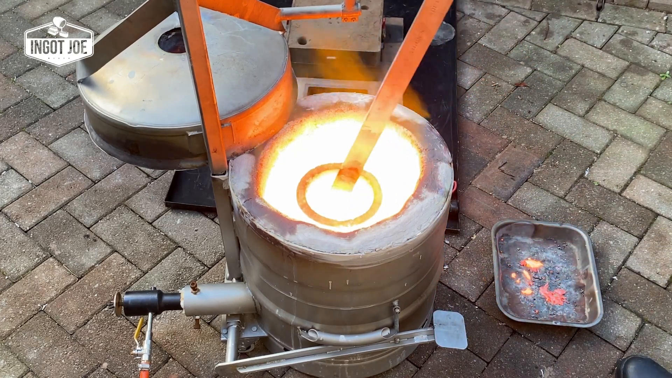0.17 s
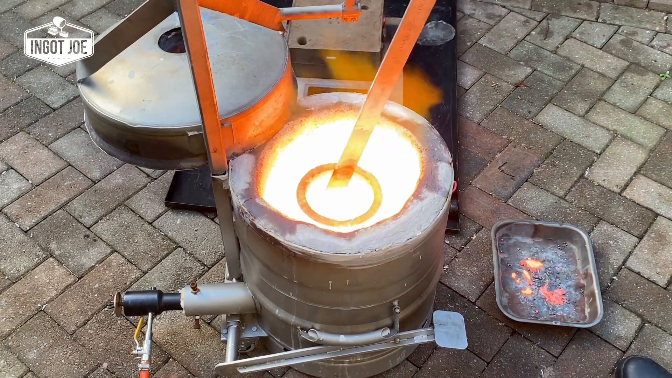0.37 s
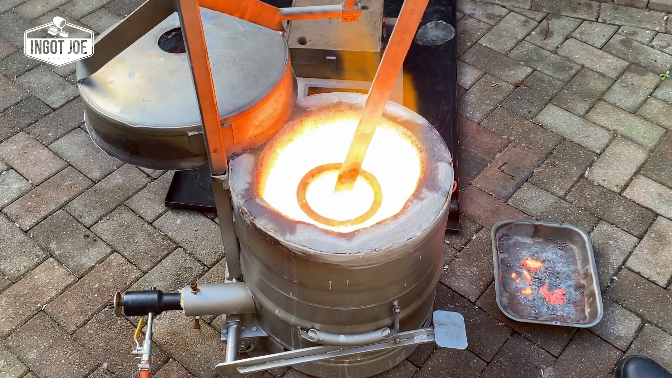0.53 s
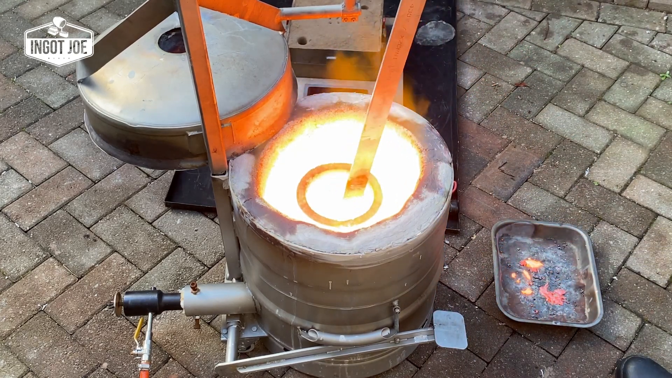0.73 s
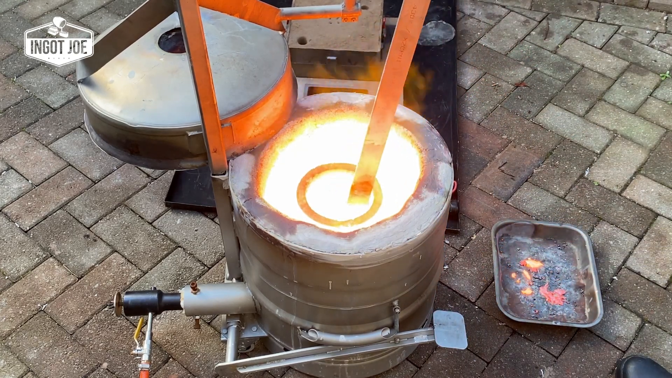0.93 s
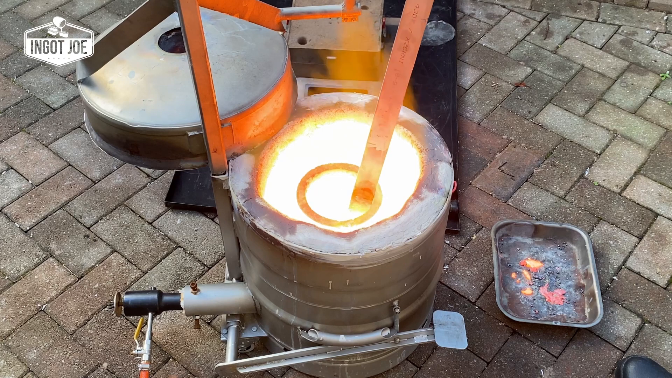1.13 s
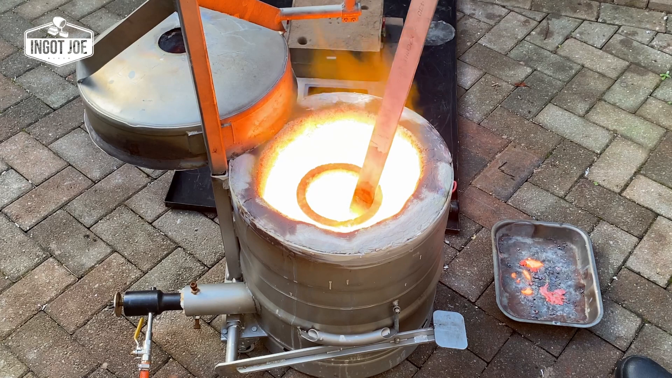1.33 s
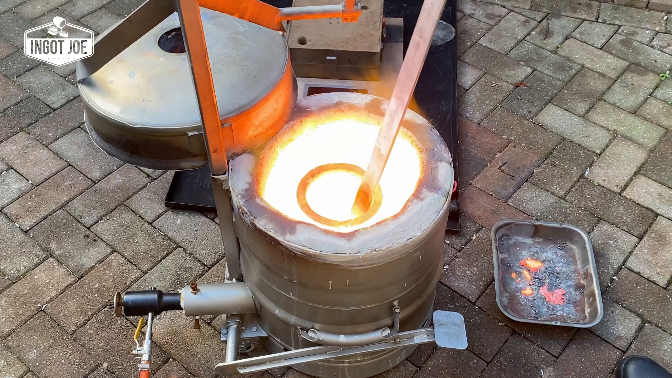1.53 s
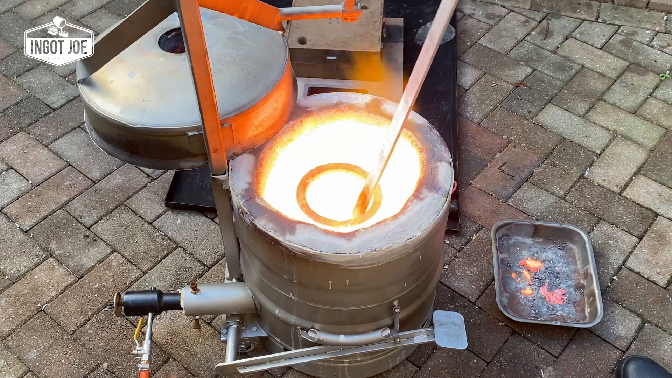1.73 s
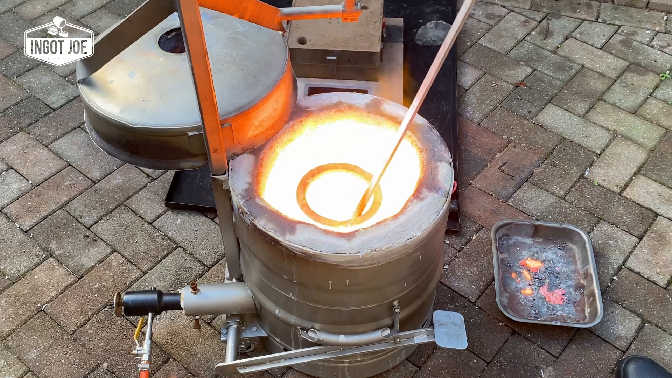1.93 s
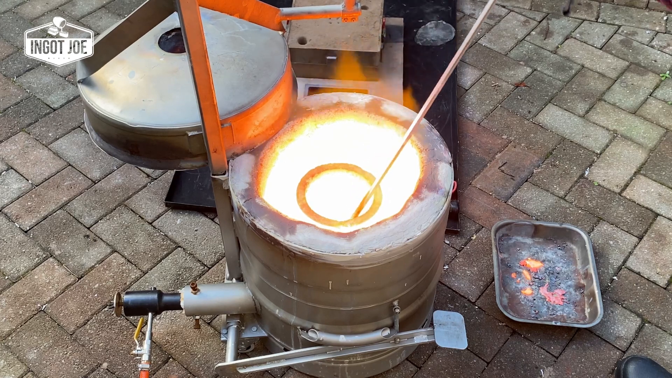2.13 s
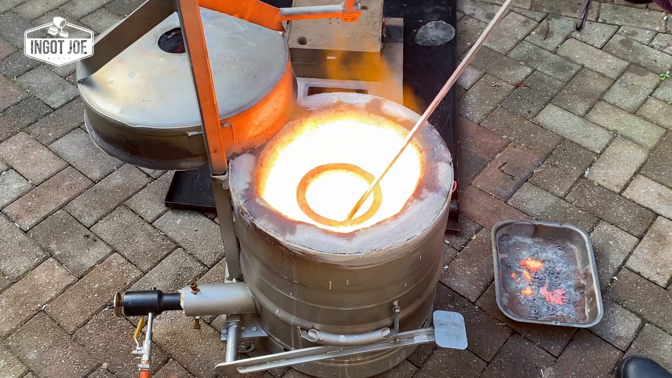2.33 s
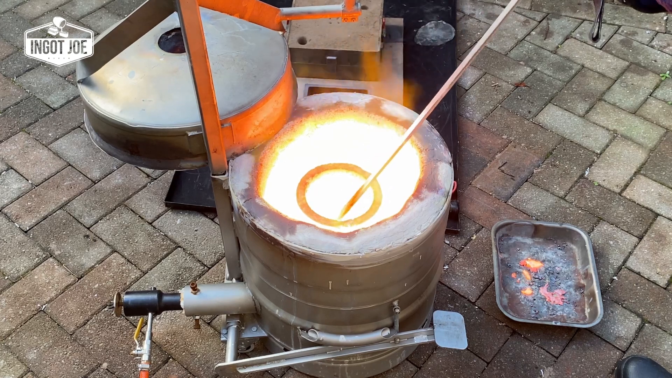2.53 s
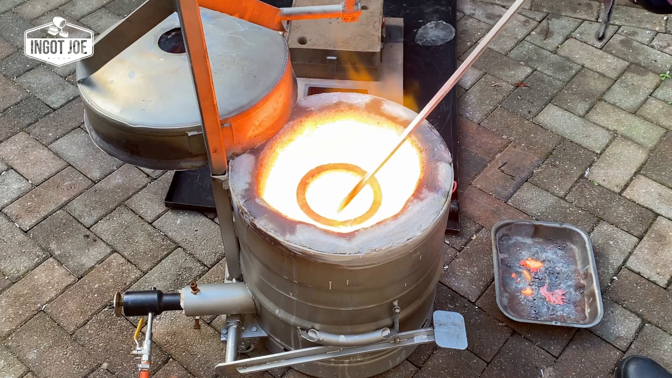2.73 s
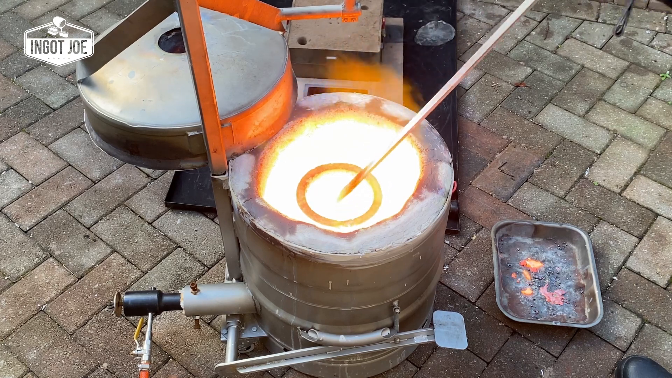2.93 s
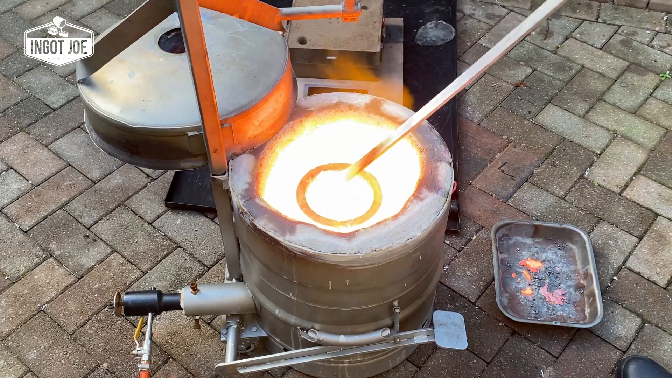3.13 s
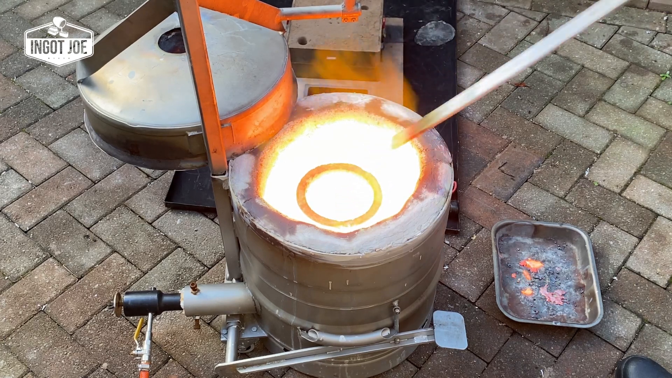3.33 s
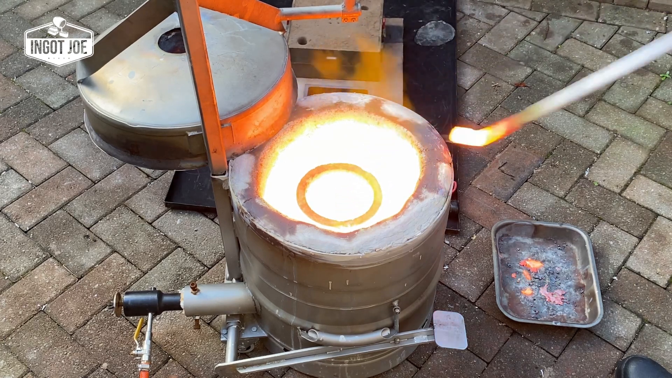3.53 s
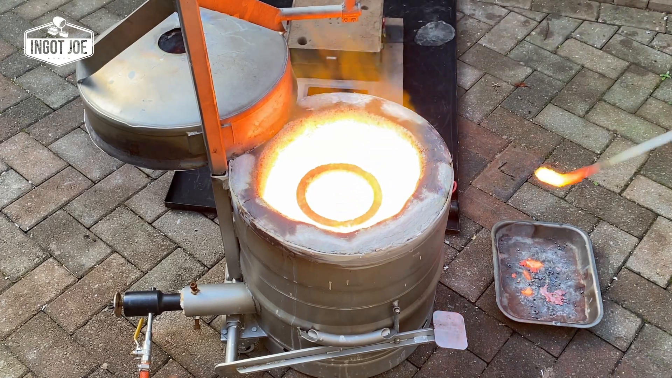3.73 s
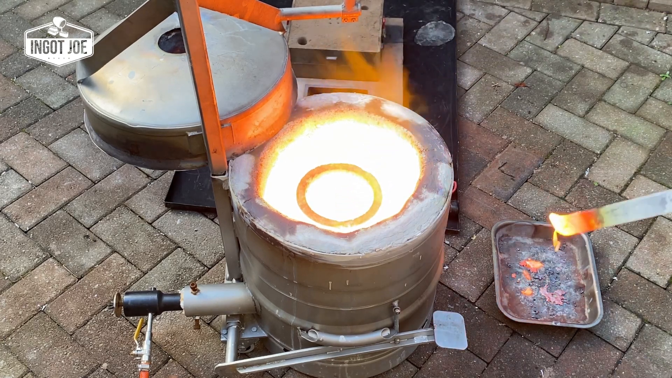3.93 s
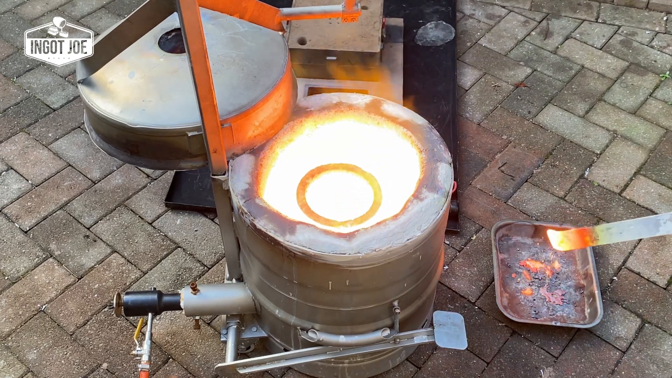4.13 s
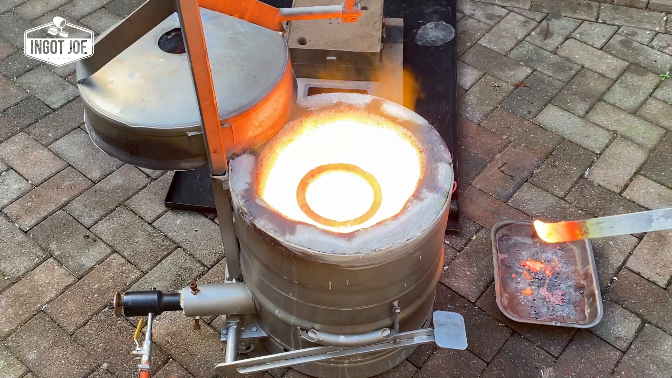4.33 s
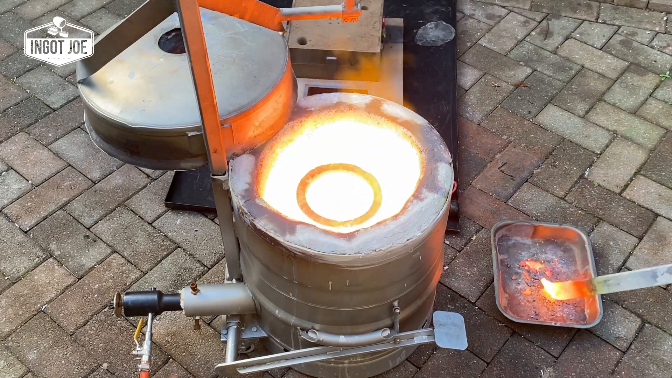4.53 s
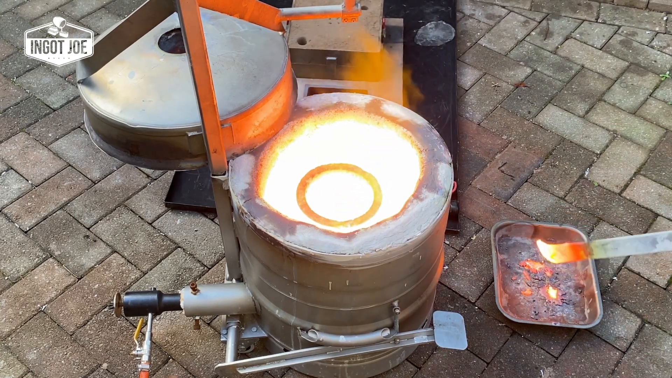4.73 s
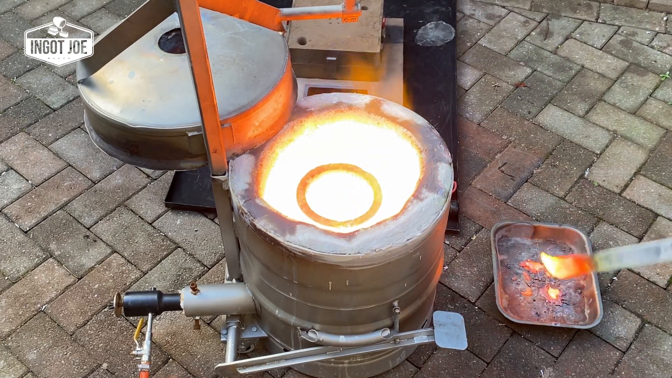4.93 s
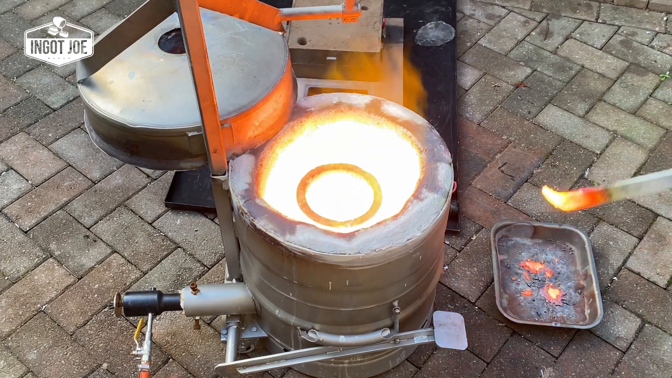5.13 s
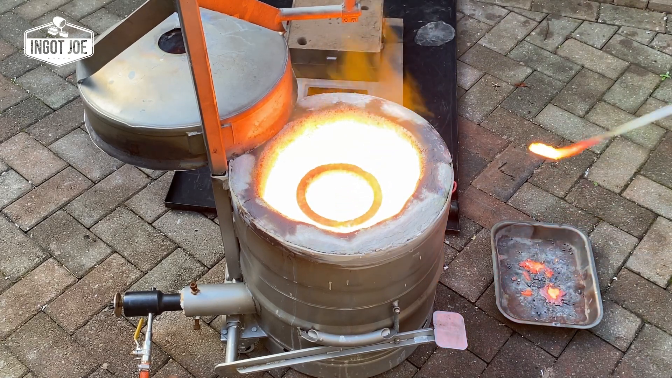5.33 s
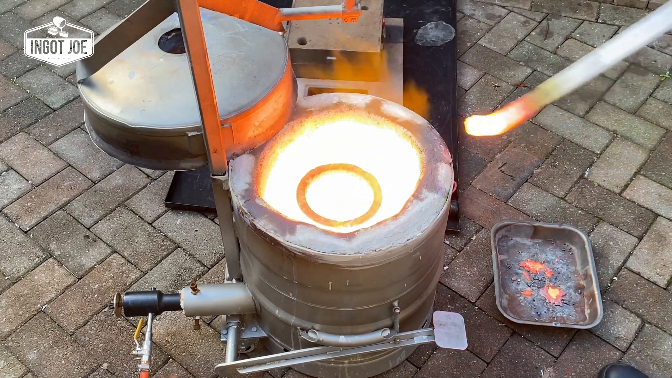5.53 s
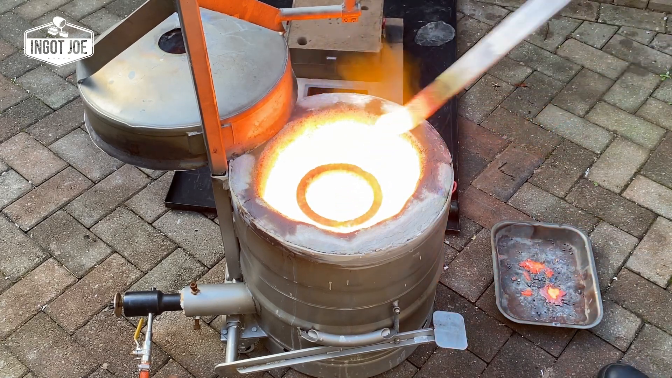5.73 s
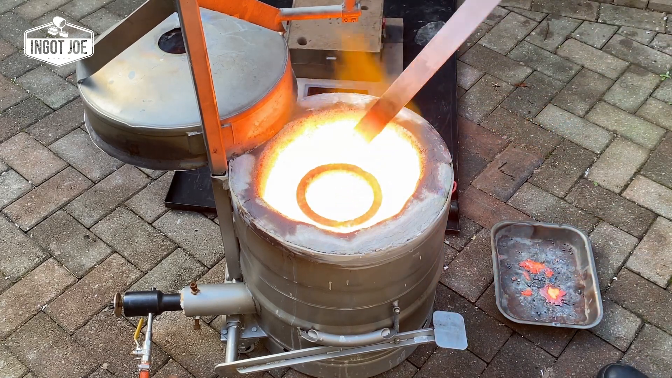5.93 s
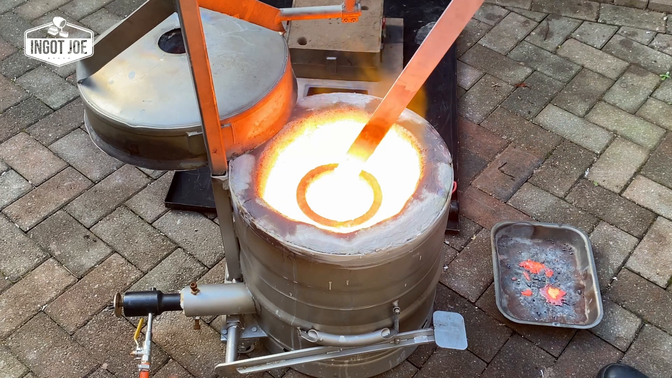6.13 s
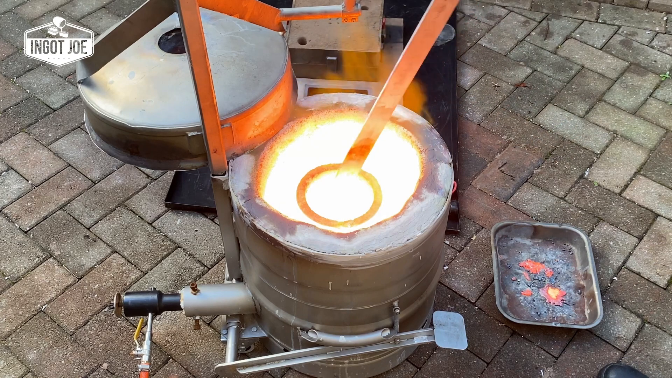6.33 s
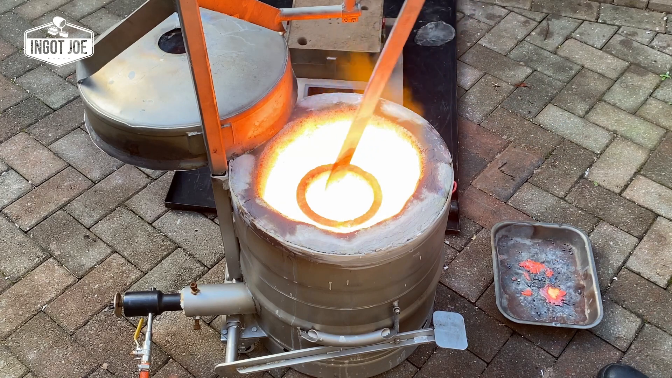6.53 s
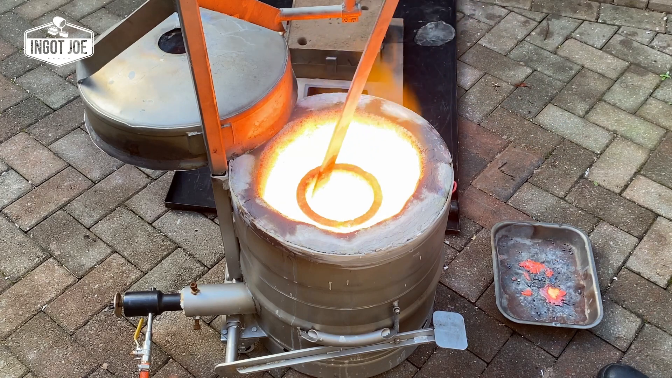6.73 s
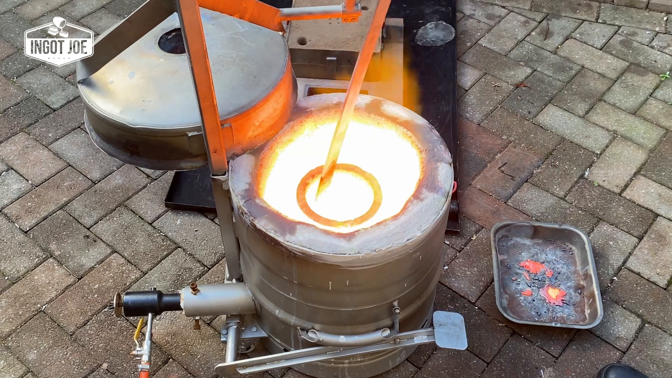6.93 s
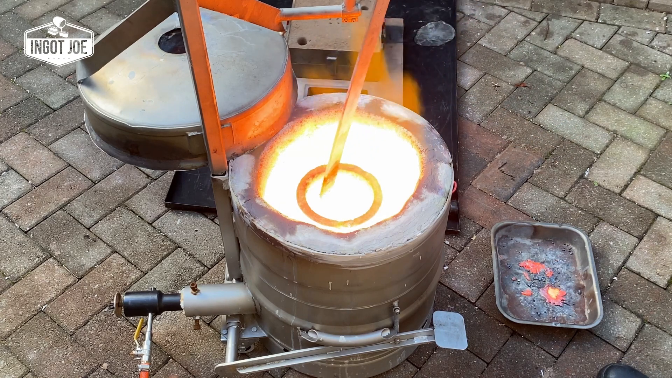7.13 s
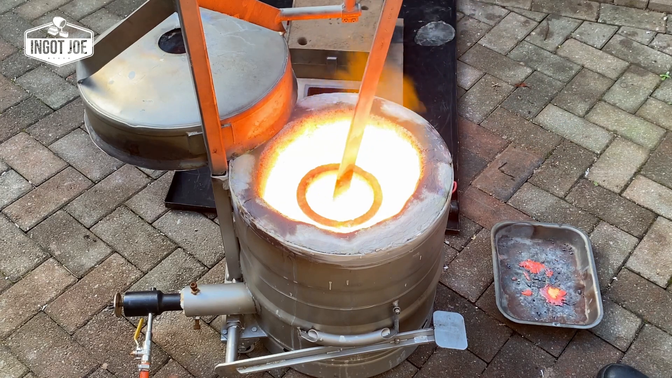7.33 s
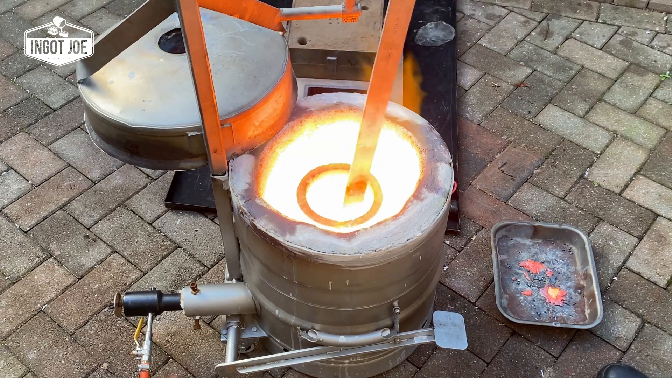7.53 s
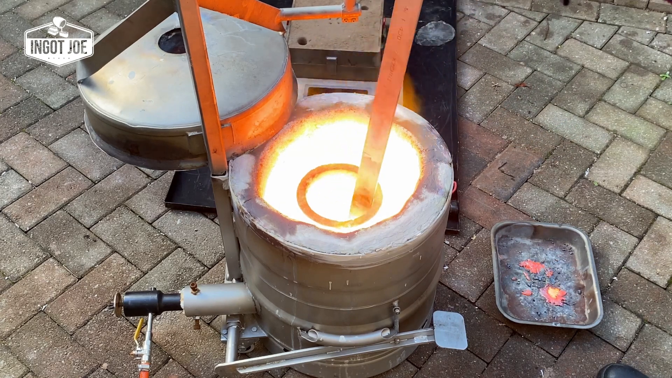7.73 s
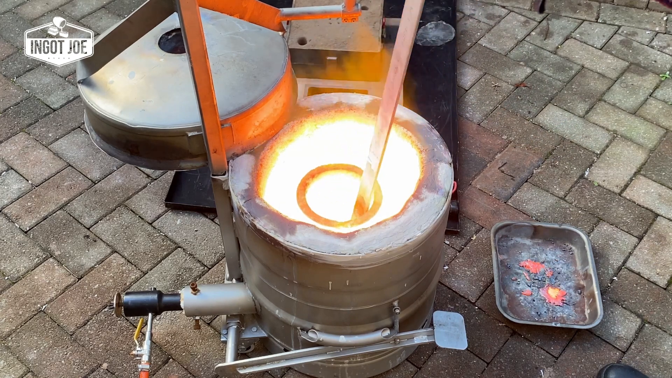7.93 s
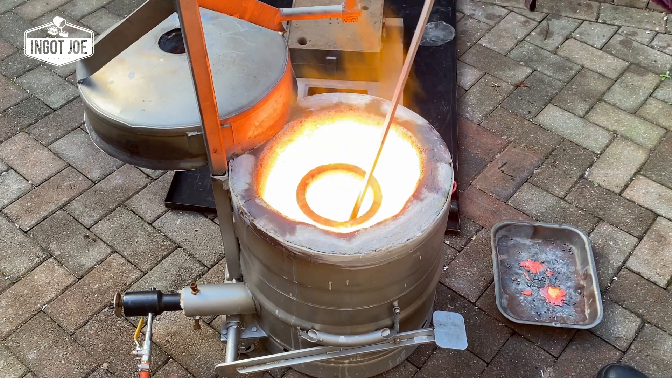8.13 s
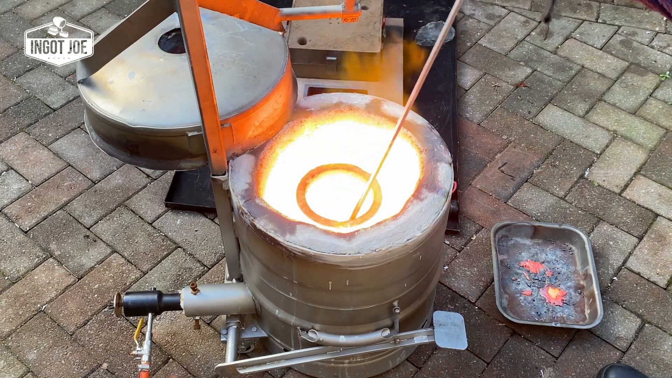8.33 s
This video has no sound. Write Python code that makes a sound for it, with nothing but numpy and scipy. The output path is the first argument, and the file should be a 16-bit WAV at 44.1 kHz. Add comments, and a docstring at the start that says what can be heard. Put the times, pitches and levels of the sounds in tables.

```python
"""A gas burner roars in an open melting furnace: turbulent combustion noise rings chamber and tube.
Its gas jet, broadband turbulence noise with narrow edge tones, hisses and whistles thinly at the nozzle.
Twice a steel skimmer knocks a metal tray: damped modes ring, the blade chatters and dross spatters.
Faint ticks surround the knocks; weak reflections from a paved yard colour every source but the ticks.
All is heard at two ports just above the furnace, as filtered noise and impulse-driven modes."""
import sys
import numpy as np
from scipy import signal
from scipy.fft import rfft, irfft
from scipy.io import wavfile
from scipy.ndimage import uniform_filter1d, minimum_filter1d, map_coordinates

SR = 44100
rng = np.random.default_rng(int(sys.argv[2]) if len(sys.argv) > 2 else 0)


def generate_wav(signal):
    """Clip the signal to [-1, 1] and save it as 16-bit WAV at the path in sys.argv[1]."""
    frames = np.transpose(np.atleast_2d(signal))
    scaled = np.clip(frames, -1, 1) * 32767
    pcm = np.round(scaled).astype(np.int16)
    wavfile.write(sys.argv[1], SR, pcm)


N = 369116

# spectral shape of the burning noise, before its bands are levelled: f/Hz, relative density/dB
BURNING_SPECTRUM = [(18, -75), (30, -78.5), (48, -61), (65, -50), (150, -44), (200, -51.5), (310, -36),
                    (390, -46.5), (520, -48), (700, -60), (1000, -71.5), (1400, -68), (1650, -79.5),
                    (2150, -79)]
# resonances and notches of chamber, tube and ground: f/Hz, width/Hz, gain/dB
CHAMBER_RESONANCES = [(88, 8, 4), (99, 9, -3), (117.3, 4.4, 2.5), (163.8, 58, 7), (199, 7.6, -3.5),
                      (225.3, 28, 7), (249.7, 7.7, -15.5), (262.6, 13.4, 10), (293.5, 22, 2),
                      (321.3, 26.5, 6), (362.2, 34, 6), (375.7, 7.1, -7.5), (400, 7, -5), (413, 9.2, 7),
                      (450, 11, -2.5), (482.6, 17.6, 7.5), (654, 35, 3), (677, 12, -4.5), (700.6, 18, 5),
                      (752, 30, -5), (779, 12, 6), (807, 24, -3.5), (906, 55, 14.5), (986, 16, -6),
                      (1013, 36, 7), (1164, 17, 9), (1242, 36, -9), (1362, 51, 7), (1680, 45, 8),
                      (1967, 48, 10)]
# the skimmer's path from the melt to the tray and back: t/s, share of the way out/1
SKIMMER_AWAY = [(2.2, 0.2), (3.2, 0.32), (3.6, 1), (5.5, 0.94), (6.3, 0.1), (7.1, 0)]
# change of the resonances with the furnace mouth clear: f/Hz, width/Hz, gain/dB
CLEAR_MOUTH = [(264, 20, 3.5), (310, 58, -4), (405, 45, 4), (525, 39, 1.5), (760, 80, 2.5), (990, 50, 3)]
# gas jet noise under the edge tones: f/Hz, density/(dB per Hz)
JET_SPECTRUM = [(600, -100), (1600, -86), (2300, -78), (3300, -79), (4000, -82.5), (5500, -80), (8300, -80),
                (10200, -77.5), (11500, -77), (12500, -78.5), (13400, -81.5), (14400, -78), (15800, -84)]
# edge tones of the nozzle: f/Hz, width/Hz, gain/dB
NOZZLE_TONES = [(2827, 92, 4.5), (4402, 70, 9), (4930, 80, 3.5), (5650, 300, 4.2), (7369, 139, 3),
                (9553, 300, 8), (10790, 110, 19)]
# skimmer knocks and rebounds: t/s, relative level/dB, rattle gain/dB, dross spatter gain/dB
KNOCKS = [(4.4174, 0, -11.5, -.5), (4.471, -18, -17, -16), (4.733, -2, -4.5, -12), (4.7397, -17, -2, -17),
          (4.7645, -17, -11, -20), (4.782, -20, -14, -10)]
# modes of the struck tray: f/Hz, relative level/dB, t60/s
TRAY_MODES = [(1170, -21.5, .1), (1220, -17, .045), (1285, -22, 0.049), (1420, -22, .065),
              (1620, -28, .035), (1803, -28, .13), (1990, -28, .15), (2230, -31, .1), (2390, -32, .1),
              (2485, -32, .11), (2830, -37, .07), (3110, -33, .11), (3630, -35, .1), (3830, -36, .1)]
# crack of a contact and rattle of the tray on the paving: f/Hz, relative density/dB
RATTLE_SPECTRUM = [(600, -82), (1150, -60), (1600, -60), (2200, -61), (3100, -63.5), (3900, -66),
                   (5000, -74), (8000, -81), (9500, -88)]
# crumbs of dross landing: f/Hz, relative density/dB
SPATTER_SPECTRUM = [(1500, -84), (4000, -75), (7000, -70.5), (9000, -63), (11200, -67), (12500, -68),
                    (15000, -81)]
# faint ticks, likely flakes of dross dropping: t/s, gain/dB
FLAKES = [(4.339, -67), (4.516, -69)]
# balance of the two microphone ports: f/Hz, left minus right level/dB
PORT_BALANCE = [(62, -0.5), (127, 0), (191, 4), (245, 0.04), (324, 2.45), (442, 4), (595, 4.57),
                (728, 8.27), (861, 4.76), (1013, 1.5), (1294, -2.6), (1804, 0.1), (2592, -0.8),
                (4000, -0.2), (7000, 0)]
# phase between the ports: f/Hz, lead of the left/rad
PORT_PHASE = [(60, 0), (700, .3), (1100, -.7), (1400, -.1), (1800, -1.9), (2150, -2.7), (2500, -3.2),
              (2800, -4.8), (3500, -6.2), (5000, -6.7), (7400, -7.8), (8400, -8.9), (8900, -9.4),
              (10450, -9.44), (10800, -10), (11300, -10.4), (12800, -11.3), (13300, -12.5)]
# likeness of turbulent noise at the ports: f/Hz, likeness (0 to 1)/1
PORT_LIKENESS = [(30, 1), (60, 0.89), (130, 0.95), (190, 0.86), (260, 0.96), (450, 0.77), (600, 0.92),
                 (780, 0.55), (1400, 0.82), (1900, 0.37), (2400, 0.88), (4000, 1), (7000, 0.11), (8600, 1),
                 (13000, 1)]

# rms of roar and rumble before they waver and the mouth clears, in dB
ROAR_DB, RUMBLE_DB = -14.5, -21
# the whole flame heaves at random: spread in dB, changes per second
HEAVE_DB, HEAVE_PER_S = 0.11, 5
# separate waver of rumble and roar in dB; swirling hot gas detunes the chamber by a share of pitch
WAVER_DB, DETUNE = .6, .004
# chatter: mean contacts per second, level against its knock in dB, scatter in dB, t60 in s
CHATTER_PER_S, CHATTER_DB, CHATTER_SPREAD_DB, CHATTER_T60_S = 250, -5.5, 5.5, 0.13
# short crack of every contact: relative level in dB, t60 in s
CRACK_DB, CRACK_T60_S = 1, .013
# grit under the tray makes its rattle grainy: spread in dB, grains per second
GRIT_DB, GRIT_PER_S = 4, 700
FLAKE_HZ, FLAKE_WIDTH_HZ, FLAKE_T60_S = 5500, 1100, 0.094
TOP_HZ = 15800  # upper limit of the recorder

T = np.arange(N) / SR  # time in s
F = np.maximum(np.fft.rfftfreq(N, 1 / SR), 1)  # frequency in Hz


def flame():
    """Combustion noise: turbulent burning excites resonances as rumble, roar and a fluttering rush."""
    colour_db = across(BURNING_SPECTRUM) + bells(CHAMBER_RESONANCES)
    burn = at_ports() * yard() * undb(colour_db) * below(hz=2020, order=6)
    deep, body = below(hz=209, order=12), below(hz=573, order=10)
    rumble = level(irfft(burn * deep, N), RUMBLE_DB)
    roar = level(irfft(burn * np.sqrt(1 - deep ** 2) * body, N), ROAR_DB)
    # small eddies burn out unevenly, so the upper rush flutters
    rush = irfft(burn * np.sqrt(1 - body ** 2), N) * undb(-1.0 + 0.63 * walk(rate=25))
    rumble = rumble * undb(WAVER_DB * walk(rate=9))
    roar = roar * undb(WAVER_DB * walk(rate=7.6))
    swirled = drift(mouth(rumble + roar + rush), DETUNE * walk(rate=6))
    return swirled * undb(HEAVE_DB * walk(rate=HEAVE_PER_S))


def mouth(fire):
    """Radiation from an opening: resonances shift in strength while the skimmer is away from the mouth."""
    away = np.clip(np.interp(T, *np.transpose(SKIMMER_AWAY)), 0, 1)
    clear = irfft(rfft(fire) * undb(bells(CLEAR_MOUTH)), N)
    return fire + away * (clear - fire)


def gas_jet():
    """Jet noise: turbulent hiss with narrow edge tones, wandering a little with the gas pressure."""
    spectrum_db = across(JET_SPECTRUM) + bells(NOZZLE_TONES)
    hiss = irfft(at_ports() * yard() * undb(spectrum_db), N)
    pressure = walk(rate=2.5)
    return drift(hiss, .0008 * pressure) * undb(0.15 * pressure + 0.64 * walk(rate=20))


def skimmer():
    """Impact excitation: contacts crack and ring the tray, rattle it and shed crumbs; a wall answers."""
    rattle = irfft(white()[0] * undb(across(RATTLE_SPECTRUM)), N)
    crumbs = irfft(white()[0] * undb(across(SPATTER_SPECTRUM)), N) * undb(2.6 * walk(rate=600))
    grit = rattle * undb(GRIT_DB * walk(rate=GRIT_PER_S))
    blows, chatter = contacts(count=20)
    metal = np.zeros(N)
    for hz, db, t60 in TRAY_MODES:
        # every bounce lands on another spot, so it pushes each mode one way or the other
        pushes = blows + chatter * rng.choice([-1, 1], N)
        metal += undb(db) * ring(pushes, hz, t60).imag
    # dross on the blade cushions the first touch; the bounces crack harder
    cracks = ring(undb(-7) * blows + chatter, 0, CRACK_T60_S).real
    loose = undb(CRACK_DB) * rattle * uniform_filter1d(cracks, size=25)
    for start, _, rattle_db, dross_db in KNOCKS:
        loose += undb(rattle_db) * grit * fade(start, t60=0.079, rise_s=0.001)
        loose += undb(dross_db) * crumbs * fade(start, t60=0.18, rise_s=0.0077)
    direct = irfft(rfft(undb(-5.5) * metal + loose) * yard() * port_phase(), N)
    echo = np.array([np.interp(T - .018, T, port) for port in direct])  # 18 ms later
    return direct + undb(-8.0) * echo


def contacts(count):
    """Repeated impact: short pushes for the knocks, and an uneven, dying chatter after each."""
    blows, chatter = np.zeros((2, N))
    for start, db, *_ in KNOCKS:
        late = np.cumsum(rng.uniform(.4, 1.6, count)) / CHATTER_PER_S
        size = undb(db + CHATTER_DB + CHATTER_SPREAD_DB * rng.standard_normal(count))
        blows[int(start * SR)] = undb(db)
        dying = np.exp(-np.log(1000) * late / CHATTER_T60_S)
        chatter[((start + late) * SR).astype(int)] += size * dying
    # a contact lasts about a tenth of a millisecond
    return uniform_filter1d(np.array([blows, chatter]), size=5)


def flakes():
    """Transient noise: flakes of dross tick as decaying bursts in one resonant band."""
    band = 1 / (1 + (2 * (F - FLAKE_HZ) / FLAKE_WIDTH_HZ) ** 2)
    tick = irfft(white()[0] * port_phase() * band, N)
    return tick * sum(undb(db) * fade(start, FLAKE_T60_S, rise_s=.001) for start, db in FLAKES)


def yard():
    """Diffuse reflection: weak echoes of paving and walls ripple mainly the middle of the spectrum."""
    taps = rng.standard_normal((2, N)) * fade(0, t60=0.073, rise_s=0.0022)
    taps /= np.sqrt(np.sum(taps ** 2, axis=1, keepdims=True))
    band = (1 - below(hz=473, order=4)) * below(hz=6800, order=10)
    return 1 + undb(-12) * rfft(taps) * band


def at_ports():
    """Partial coherence: spectra of one turbulent noise as it reaches the left and right port."""
    common, apart = white()
    like = np.clip(across(PORT_LIKENESS), 0, 1)
    sign = np.array([[1], [-1]])
    pair = common * np.sqrt((1 + like) / 2) + sign * apart * np.sqrt((1 - like) / 2)
    return pair * undb(sign * across(PORT_BALANCE) / 2) * port_phase()


def port_phase():
    """Interchannel phase: the lead and lag that the left and right port give to a sound."""
    return np.exp(1j * np.array([[1], [-1]]) * across(PORT_PHASE) / 2)


def ring(pushes, hz, t60):
    """Damped oscillation: the imaginary part swings; at 0 Hz the real part only decays."""
    pole = np.exp((2j * np.pi * hz - np.log(1000) / t60) / SR)
    return signal.lfilter([1], [1, -pole], pushes + 1e-18)


def fade(start, t60, rise_s):
    """Exponential decay: an envelope that swells from a start time and dies away."""
    age = np.maximum(T - start, 0)
    return (1 - np.exp(-age / rise_s)) * np.exp(-np.log(1000) * age / t60)


def drift(pair, share):
    """Frequency modulation: a moving time warp shifts every frequency of a pair by a share."""
    place = np.arange(N) + np.cumsum(share)
    return np.array([map_coordinates(port, [place], order=5, mode="mirror") for port in pair])


def walk(rate):
    """Random modulation: levels held 1 / rate s and slewed twice; spread 1."""
    hold = max(int(SR / rate), 1)
    steps = np.repeat(rng.standard_normal(N // hold + 1), hold)
    smooth = uniform_filter1d(uniform_filter1d(steps, hold), hold)[:N]
    return smooth / smooth.std()


def white():
    """White noise: spectra of two unrelated noises at 0 dB per Hz."""
    return rfft(rng.standard_normal((2, N))) * np.sqrt(SR / 2)


def bells(modes):
    """Resonance curves: summed gain in dB of a set of resonances and notches."""
    return sum(db / (1 + (2 * (F - hz) / width) ** 2) for hz, width, db in modes)


def below(hz, order):
    """Low-pass magnitude: gain falling above a corner frequency."""
    return 1 / np.sqrt(1 + (F / hz) ** (2 * order))


def across(points):
    """Spectral interpolation: join (f/Hz, value) points on a log-frequency axis."""
    hz, value = np.transpose(points)
    return np.interp(np.log(F), np.log(hz), value)


def level(x, db):
    """Effective value: set the rms level of a pair of channels, taken at their centre."""
    return x * undb(db) / x.mean(axis=0).std()


def undb(db):
    """Logarithmic level: decibels to amplitude gain."""
    return 10 ** (np.asarray(db) / 20)


def scene():
    """Superposition: flame, gas jet, skimmer and falling dross add linearly."""
    return flame() + gas_jet() + skimmer() + flakes()


def record(dry):
    """Peak limiting and band limiting: crests are eased, the ends faded and the top cut."""
    headroom = np.minimum(1, .9 / np.maximum(np.abs(dry).max(axis=0), 1e-9))
    gain = uniform_filter1d(minimum_filter1d(headroom, size=601), size=601)
    ends = np.clip(np.minimum(T, T[-1] - T) / .004, 0, 1)  # 4 ms fades
    top_cut = signal.ellip(10, .1, 80, TOP_HZ, fs=SR, output="sos")
    return signal.sosfilt(top_cut, dry * gain * ends)


dry = scene()
out = record(dry)
generate_wav(out)
```